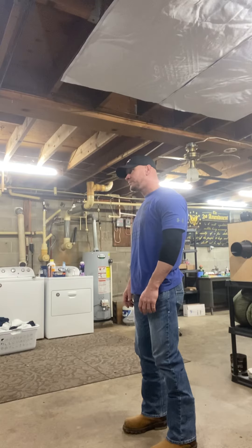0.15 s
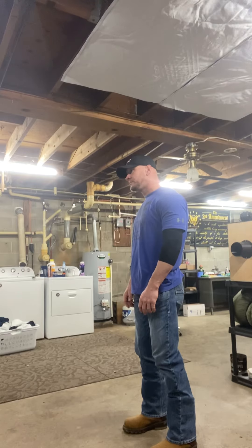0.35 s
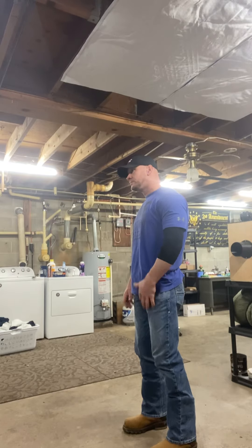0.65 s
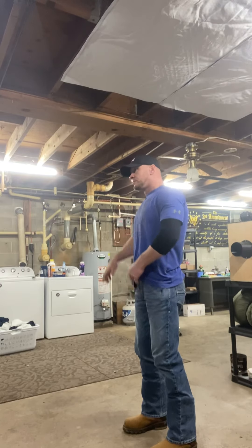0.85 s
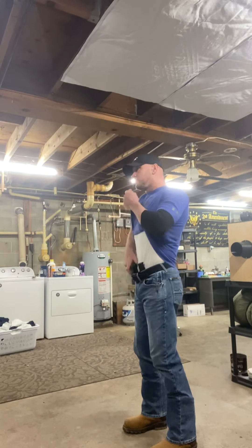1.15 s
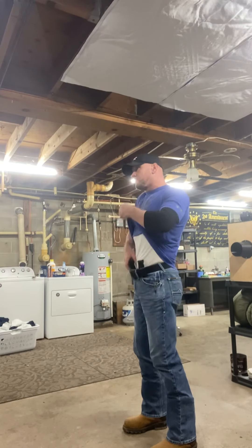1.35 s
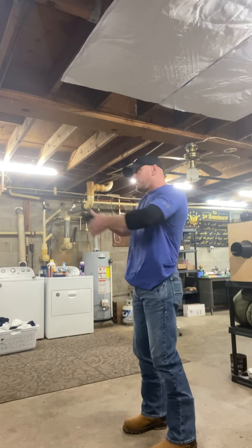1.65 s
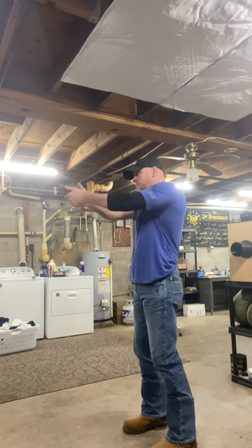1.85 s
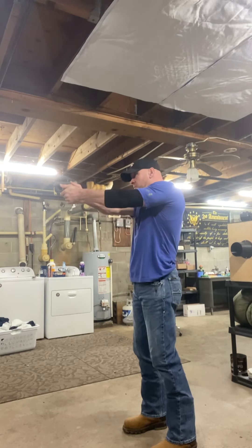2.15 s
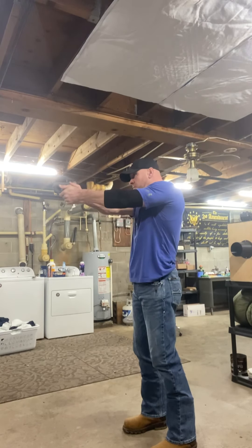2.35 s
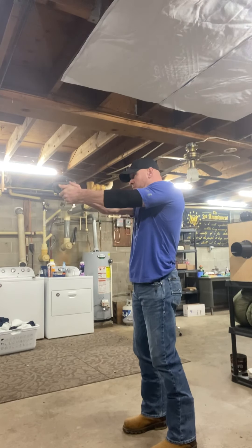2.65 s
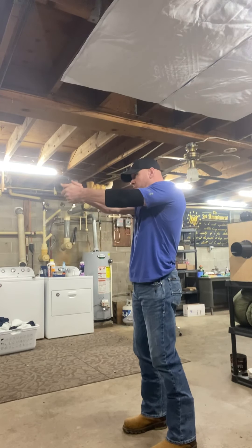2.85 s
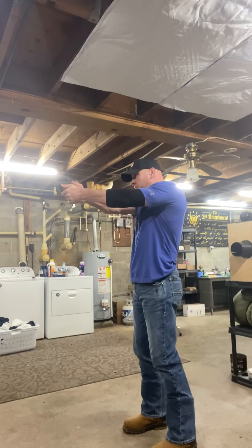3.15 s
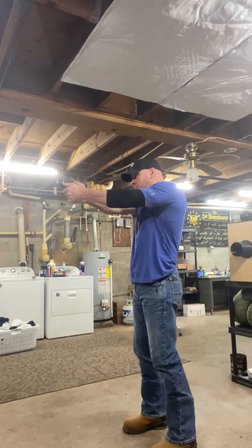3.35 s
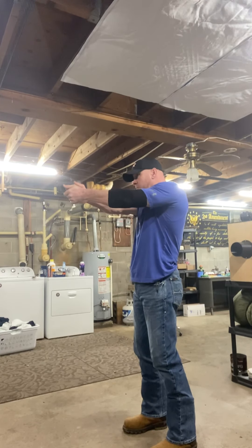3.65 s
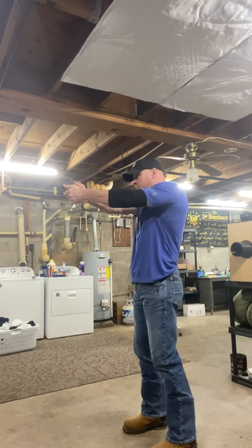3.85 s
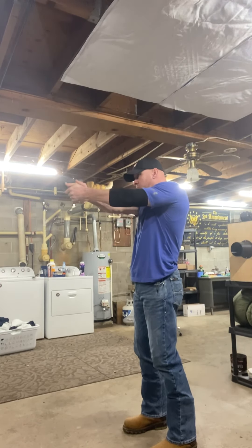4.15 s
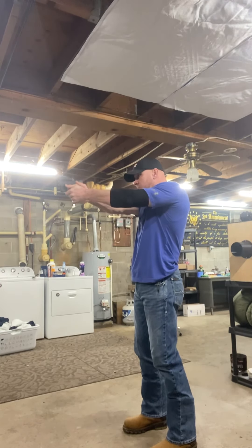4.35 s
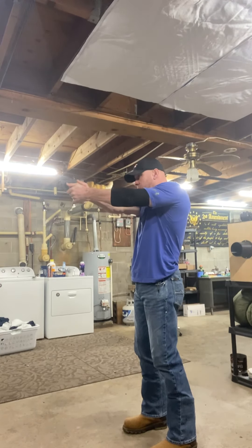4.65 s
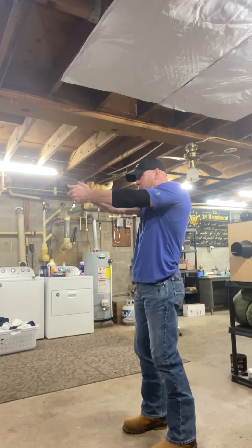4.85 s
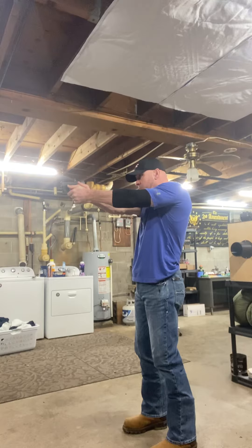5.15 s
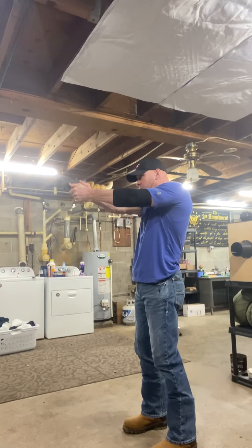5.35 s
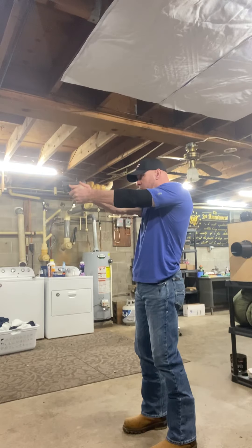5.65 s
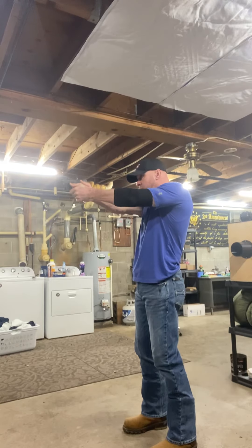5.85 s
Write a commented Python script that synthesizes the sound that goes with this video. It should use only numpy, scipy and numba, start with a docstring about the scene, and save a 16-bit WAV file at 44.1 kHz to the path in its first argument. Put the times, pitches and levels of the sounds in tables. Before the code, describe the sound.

Clothing rustles and a holster clicks softly, then a pistol fires six steady, loud shots that echo in a low, hard room.

```python
"""Six pistol shots in a basement

Over a furnace rumble and a faint lamp whine, a pistol is drawn from under a shirt: cloth rustles
and stick-slip friction rings the holster. Each of six blasts excites the dense echoes of the low,
hard room and thumps its low modes. A phone two metres away turns bass and level down after the
first shot, and its limiter flattens each blast."""
import sys
import numpy as np
from scipy import signal
from scipy.fft import rfft, irfft
from scipy.io import wavfile
from scipy.ndimage import uniform_filter1d
from numba import njit

SR = 44100
rng = np.random.default_rng(int(sys.argv[2]) if len(sys.argv) > 2 else 0)


def waveform_to_disk(signal):
    """Save audio, clipped to [-1, 1], as 16-bit WAV at the path in sys.argv[1]."""
    frames = np.transpose(np.atleast_2d(signal))
    scaled = np.clip(frames, -1, 1) * 32767
    samples = np.round(scaled).astype(np.int16)
    wavfile.write(sys.argv[1], SR, samples)


N = 264238
TAIL, PADDED = int(.9 * SR), N + 1024  # samples in a room response and in a padded spectrum
BANDS_HZ = 32 * 2 ** (np.arange(28) / 3)  # third-octave centres
# Likeness of the room's sound at the two microphone ports: frequency_hz, correlation
ROOM_COHERENCE = [(60, .95), (150, .65), (300, .45), (700, .35), (1200, .3), (2000, .45), (4000, .65),
                  (8000, .86), (14000, .78)]


def undb(db):
    return 10 ** (np.asarray(db) / 20)


def unit_rms(x):
    return x / np.sqrt(np.mean(x ** 2))


def bins_hz(size):
    return np.maximum(np.arange(size // 2 + 1) * SR / size, 1.)


def at_hz(table, hz):
    """Interpolate a table on a logarithmic frequency axis."""
    knots_hz, values = np.transpose(table)
    return np.interp(np.log(hz), np.log(knots_hz), values)


def add(out, sound, start_s):
    i = int(start_s * SR)
    out[..., i:i + sound.shape[-1]] += sound[..., :N - i]


def noise_spectra(size, coherence):
    """Partial coherence: left and right are the sum and difference of two independent noises."""
    correlation = np.clip(at_hz(coherence, bins_hz(size)), 0, 1)
    mid, side = rfft(rng.standard_normal((2, size)))
    return np.sqrt((1 + correlation) / 2) * mid + np.sqrt((1 - correlation) / 2) * side * [[1], [-1]]


def coloured_noise(colour, coherence):
    """Spectral shaping of stereo noise to unit rms; colour rows are frequency_hz, density_db."""
    return unit_rms(irfft(noise_spectra(N, coherence) * undb(at_hz(colour, bins_hz(N))), N))


def ring(modes, size):
    """Free vibration: a blow leaves damped sines, each with its own phase lead at the left port."""
    t = np.arange(size) / SR
    return sum(undb(db) * np.sin(2 * np.pi * hz * t + lead * np.array([[1], [0]])) * 1000. ** (-t / t60)
               for hz, db, t60, lead in modes)


def furnace():
    """Broadband rumble whose long waves reach both ports alike, while the short ones are incoherent."""
    # Furnace spectrum: frequency_hz, relative_density_db
    colour = [(20, -31.5), (35, -26), (58, -10), (97, -14.5), (120, -9.5), (202, -3.5), (250, -5.5),
              (300, -8.5), (370, -20.5), (480, -23), (560, -35), (820, -33), (1200, -49.5), (2500, -46),
              (4300, -51.5), (5200, -62.5), (13500, -64)]
    # Likeness at the two ports: frequency_hz, correlation
    coherence = [(60, 0.97), (130, 1), (290, 0.87), (640, 0.11), (1400, .01), (15000, .01)]
    return undb(-45) * coloured_noise(colour, coherence)


def lamp():
    """Steady vibration of a lamp ballast radiates thin pure tones."""
    # Ballast tones: pitch_hz, rms_db
    tones = [(7800, -97), (11698, -96)]
    t = np.arange(N) / SR
    return sum(undb(db) * np.sqrt(2) * np.sin(2 * np.pi * hz * t) for hz, db in tones)


def stroke(peak_s, rise_s, hold_s, db, fall_db_per_s):
    """Envelope of one movement: quadratic swell, hold, exponential decay."""
    t = np.arange(N) / SR - peak_s
    return np.clip(1 + t / rise_s, 0, 1) ** 2 * undb(db - fall_db_per_s * np.maximum(t - hold_s, 0))


def cloth():
    """Friction noise, modulated by folds and crinkles; separate movements add in power."""
    # Movements of shirt and hands: peak_s, rise_s, hold_s, rustle_db, treble_db
    moves = [(0.695, 0.13, 0.032, -54, -78), (0.925, 0.18, 0.094, -50, -69), (1.056, 0.11, .26, -55.5, -69),
             (1.157, .006, 0.014, -44, -58), (1.342, .012, .015, -49, -58),
             (1.376, .015, 0.018, -35, -62.5), (1.672, .012, .01, -47.5, -57)]
    rustle_power = sum(stroke(*timing, db, fall_db_per_s=136.5) ** 2 for *timing, db, _ in moves)
    treble_power = sum(stroke(*timing, db, fall_db_per_s=210.5) ** 2 for *timing, _, db in moves)
    folds = unit_rms(uniform_filter1d(rng.standard_normal(N), size=500))
    crinkles = unit_rms(uniform_filter1d(rng.exponential(size=N) ** 2 - 2, size=40))
    rustle = coloured_noise([(300, -5.5), (900, -4), (1400, -0.5), (2000, 3), (4300, -2.5),
                             (5500, -16), (16000, -34.5)], ROOM_COHERENCE)
    hiss = coloured_noise([(3000, -31), (6500, 8), (10000, -5), (14000, -3.5)], ROOM_COHERENCE)
    return undb(2.2 * folds + 1.6 * crinkles) * (rustle * rustle_power ** .5 + hiss * treble_power ** .5)


def room_response():
    """Diffuse reverberation: dense echoes act as noise decaying in each band (band x port x sample)."""
    # Reverberation time: frequency_hz, t60_s
    decay = [(40, 0.74), (110, 0.31), (280, 0.53), (740, 0.64), (1940, 0.65), (4000, 0.6), (6000, 0.48),
             (9000, 0.36), (14000, 0.28)]
    # Late swell as joists and ducts keep feeding the low middle: frequency_hz, late_gain_db
    swell = [(200, -1.5), (400, 3), (750, 6), (1200, -0.5), (2500, -3), (9000, -5.5)]
    # Imbalance of the echoes: frequency_hz, left_minus_right_db
    imbalance = [(60, 0.5), (300, -0.5), (1000, 0.5), (2000, 4), (4000, 0), (14000, 0)]
    t = np.arange(TAIL) / SR
    build_db = -7 * np.exp(-t / 0.013)  # the echoes start weak and thicken
    return_db = 3.5 * np.exp(-((t - 0.325) / 0.044) ** 2)  # as if the far end answered late
    swell_db = at_hz(swell, BANDS_HZ)[:, None] * (1 - np.exp(-t / 0.16))
    fade = undb(-60 * t / at_hz(decay, BANDS_HZ)[:, None] + build_db + return_db + swell_db)
    balance = undb(at_hz(imbalance, BANDS_HZ)[:, None] * [.5, -.5])
    spectra = noise_spectra(TAIL, ROOM_COHERENCE)
    band_power = np.clip(1 - np.abs(3 * np.log2(bins_hz(TAIL) / BANDS_HZ[:, None])), 0, 1)
    bands = irfft(spectra * np.sqrt(band_power)[:, None, :], TAIL)
    return bands * balance[:, :, None] * fade[:, None, :]


def holster_clicks(room):
    """Stick-slip friction: brief pushes excite the holster's modes, with a bright tick on top."""
    # Holster, belt and grip clicks: start_s, knock_peak_db, tick_db, t60_share, room_db, slip_count
    clicks = [(0.786, -51, -61, 0.16, -20.5, 1), (0.926, -28.5, -75, .15, -42, 2),
              (0.969, -32.5, -55, .4, -31.5, 1), (1.048, -49.5, -54.5, .3, -26, 1),
              (1.157, -30.5, -46, 0.6, -35, 3), (1.318, -42, -77, 0.2, -16, 5),
              (1.342, -47, -47, .3, -30.5, 1), (1.362, -14.5, -64.5, 0.2, -36, 5),
              (1.671, -52, -49.5, .3, -35, 2)]
    # Holster resonances: pitch_hz, level_db, free_t60_s
    modes = [(570, -9, 0.0078), (975, -1, 0.012), (1470, 4, 0.024), (1918, 15.5, 0.06), (2500, 11.5, 0.046),
             (3840, 5, .02)]
    slip_spacing_ms, contact_ms = 3.0, 0.19
    out, t = np.zeros((2, N)), np.arange(6000) / SR
    for start_s, peak_db, tick_db, t60_share, room_db, slip_count in clicks:
        slip = np.arange(slip_count)[:, None]
        slip_ms = slip_spacing_ms * (slip + 0.45 * rng.random(slip.shape)) + 2 * contact_ms
        push = np.sin(np.pi * (slip + 1) / (slip_count + 1)) * rng.choice([-1, 1], slip.shape)
        force = np.sum(push * np.exp(-(2 * (t * 1000 - slip_ms) / contact_ms) ** 2), axis=0)
        ringing = ring([(hz, db, t60 * t60_share, 0) for hz, db, t60 in modes], len(t))[0]
        knock = signal.fftconvolve(force, ringing)[:len(t)]
        tick = np.diff(rng.standard_normal(len(t) + 1)) * np.exp(-t / 0.0071) * undb(tick_db)
        click = knock * undb(peak_db) / np.max(np.abs(knock)) + tick
        echoes = signal.fftconvolve(click[None], room.sum(axis=0), axes=1)
        add(out, click, start_s)
        add(out, echoes * undb(room_db), start_s)
    return out


def scrapes_and_tones():
    """Band-limited noise swells and fades; the narrower its band, the clearer its pitch."""
    # Scrapes on the holster lip, then faint, thin tones (one very high) and a hiss
    # between shots: start_s, length_s, centre_hz, width_hz, level_db
    events = [(1.056, 0.22, 1936, 150, -53), (1.168, .14, 1890, 250, -55), (1.384, .2, 2010, 200, -63),
              (3.188, 0.16, 1583, 58, -57), (3.864, 0.17, 1537, 61.5, -56.5),
              (4.872, 0.31, 11500, 159, -68), (5.564, 0.076, 9500, 6000, -62.5)]
    out = np.zeros((2, N))
    for start_s, length_s, hz, width_hz, db in events:
        t = np.arange(int(length_s * SR)) / SR
        band = signal.butter(2, [hz - width_hz / 2, hz + width_hz / 2], "band", fs=SR, output="sos")
        noise = unit_rms(signal.sosfilt(band, rng.standard_normal(len(t))))
        add(out, noise * np.sin(np.pi * t / length_s) ** 0.19 * undb(db), start_s)
    return out


def shots(room):
    """Impulse excitation: each blast drives the diffuse field, then the room's standing waves thump."""
    # Blasts: start_s, blast_db, bass_db, treble_db, rise_ms, thump_db, linger_db_per_s
    blasts = [(2.601, 7.5, 2.5, 5, 17, 15, 6), (3.309, 7, 5.5, 0.4, 0.72, 13, -0.5),
              (3.962, 7, 4, 0.3, 0.38, 15.5, 2), (4.568, 9.5, -0.5, 0, 0.59, 18.5, 0.4),
              (5.172, 9, 3, 1, 0.44, 14.5, 1), (5.763, 9.5, 1, 1, 0.39, 7.5, -3)]
    # Muzzle blast spectrum: frequency_hz, relative_density_db
    spectrum = [(25, -37.5), (45, -11), (80, 6), (200, 1.5), (330, -6), (600, -8), (950, -7.5),
                (1630, -10.5), (2500, -8.5), (4000, -15), (6500, -27), (12800, -29), (16500, -34)]
    # Low standing waves: pitch_hz, level_db, t60_s, left_lead_rad
    modes = [(30, -13, 0.16, .1), (43.7, -31.5, 0.9, .1), (46.66, -30.5, 0.9, .1), (58.4, -7, 0.16, .1),
             (80.4, -6, 0.17, 0.27), (123, -8.5, 0.2, 0.45), (173, -10, 0.088, 1.4)]
    bass_knee_hz, treble_knee_hz = 353, 6100
    fresh_share = 0.51  # echo power that varies from shot to shot as aim and stance shift
    out, t = np.zeros((2, N)), np.arange(TAIL) / SR
    ms = t * 1000
    colour = undb(at_hz(spectrum, BANDS_HZ))
    colour /= np.sqrt(np.sum(colour ** 2 * BANDS_HZ) / SR)
    bass = 1 / (1 + (BANDS_HZ / bass_knee_hz) ** 2)
    treble = 1 / (1 + (treble_knee_hz / BANDS_HZ) ** 8)
    thump = ring(modes, TAIL) * (1 - np.exp(-ms / 5.7)) ** 2
    for start_s, blast_db, bass_db, treble_db, rise_ms, thump_db, linger_db_per_s in blasts:
        echoes = np.sqrt(1 - fresh_share) * room + np.sqrt(fresh_share) * room_response()
        band_rise_ms = rise_ms + 0.6 * treble + (3.3 + 0.8 * rise_ms) * bass  # both ends build later
        onset = (1 - np.exp(-ms / band_rise_ms[:, None])) ** (2 + 5 * treble[:, None])
        band_gain = colour * undb(blast_db + bass_db * bass + treble_db * treble)
        envelope = band_gain[:, None] * onset * undb(linger_db_per_s * t)
        add(out, np.einsum("bcn,bn->cn", echoes, envelope), start_s)
        thump_lag_ms = 8.5 + 0.75 * rise_ms  # the low modes wait for the blast to build
        add(out, thump * undb(thump_db), start_s + thump_lag_ms / 1000)
    return out


def port_delay(sound):
    """Path difference: the shooter is nearer the right port, so the left lags in phase."""
    # Phase between the ports: frequency_hz, left_lead_rad
    phase = [(0, -0.5), (2000, -1.1), (4400, -2.0), (8350, -5.0), (9500, -6.50), (11500, -7.5), (13500, -8),
             (22050, -21)]
    lead_rad = np.interp(bins_hz(PADDED), *np.transpose(phase))
    left = irfft(rfft(sound[0], PADDED) * np.exp(1j * lead_rad), PADDED)[:N]
    return np.array([left, sound[1]])


def scene():
    """Superposition of the shooter's sounds and the steady background."""
    room = room_response()
    shooter = shots(room) + cloth() + holster_clicks(room) + scrapes_and_tones()
    return port_delay(shooter) + furnace() + lamp()


@njit
def follow(x, attack, release):
    """First-order lag: each sample closes one share of the gap when rising, another when falling."""
    envelope, level = np.empty(len(x)), 0.
    for i in range(len(x)):
        level += (x[i] - level) * (attack if x[i] > level else release)
        envelope[i] = level
    return envelope


def compressor_gain(x, threshold_db, share, attack_s, release_s):
    """Dynamic compression: the gain takes back a share of the level above a threshold."""
    peak = follow(np.max(np.abs(x), axis=0), 0.23, 1 / (0.0058 * SR))
    cut_db = np.maximum(20 * np.log10(peak + 1e-9) - threshold_db, 0) * share
    return undb(-follow(cut_db, 1 / (attack_s * SR), 1 / (release_s * SR)))


def record(dry):
    """Automatic gain control: the phone cuts bass, then level, then limits and saturates the peaks."""
    # Response of the microphone ports: frequency_hz, gain_db
    response = [(5000, -3), (5500, -2), (5900, -2.5), (6400, 1.5), (13800, -3.5), (14300, -24),
                (16000, -32)]
    bass_edge_hz, top_hz = 473, 15800
    x = irfft(rfft(dry, PADDED) * undb(at_hz(response, bins_hz(PADDED))), PADDED)[:, :N]
    bass = signal.sosfiltfilt(signal.butter(2, bass_edge_hz, fs=SR, output="sos"), x)
    x -= bass * (1 - compressor_gain(x, threshold_db=-19, share=.8, attack_s=.1, release_s=9.))
    x *= compressor_gain(x, threshold_db=-10, share=0.87, attack_s=0.062, release_s=5.2)
    x *= compressor_gain(x, threshold_db=-5.5, share=0.84, attack_s=0.0024, release_s=0.027)  # limiter
    saturated = 1.105 * np.tanh(x / 0.97)
    return signal.sosfilt(signal.ellip(8, .2, 70, top_hz, fs=SR, output="sos"), saturated)


dry = scene()
out = record(dry)
waveform_to_disk(out)
```